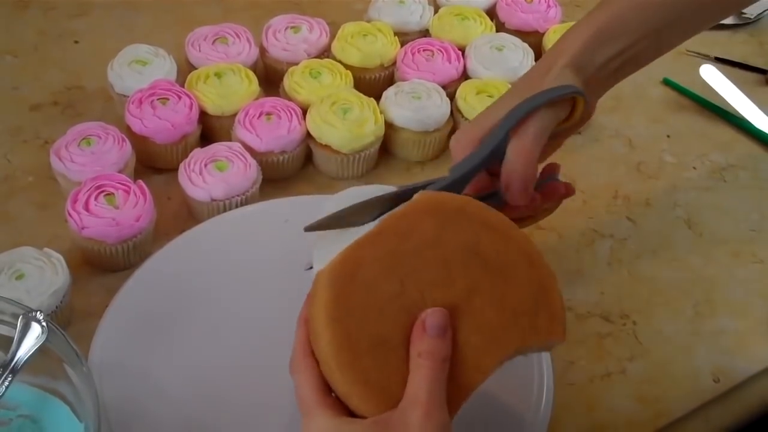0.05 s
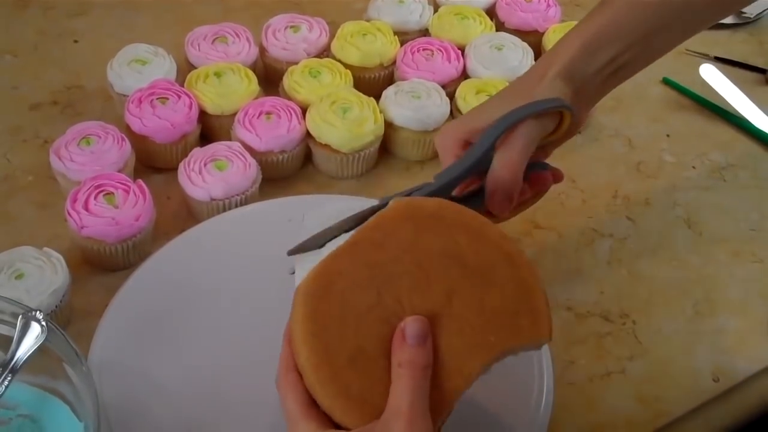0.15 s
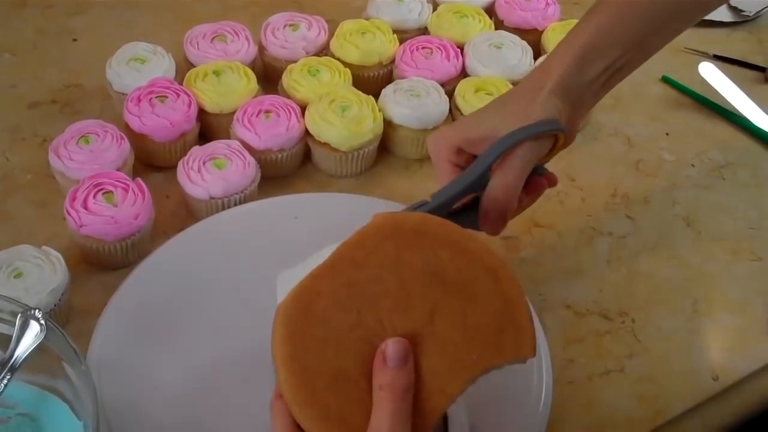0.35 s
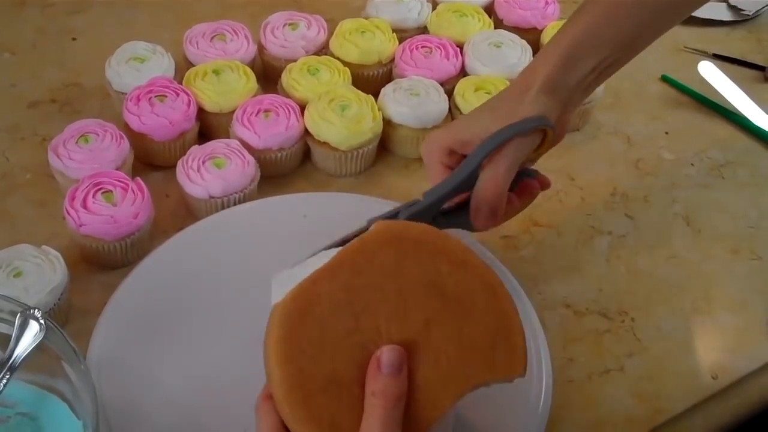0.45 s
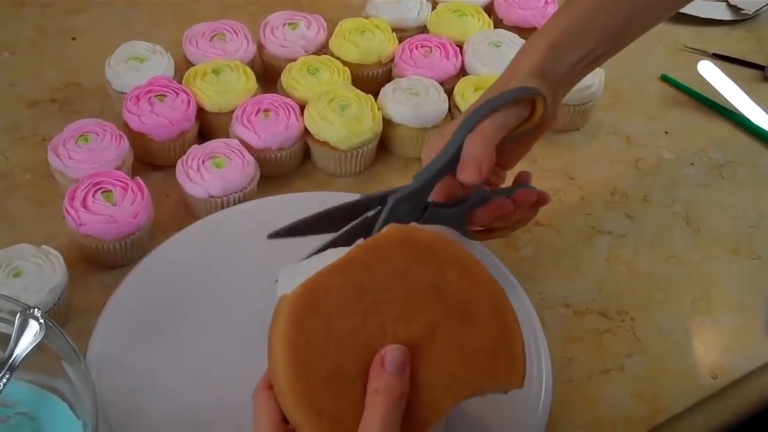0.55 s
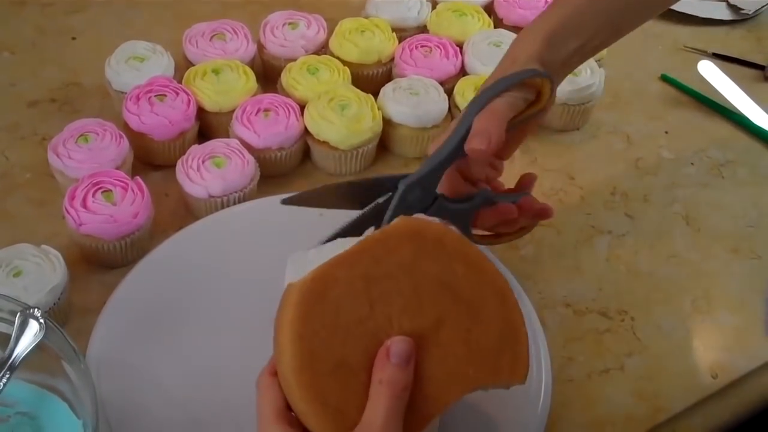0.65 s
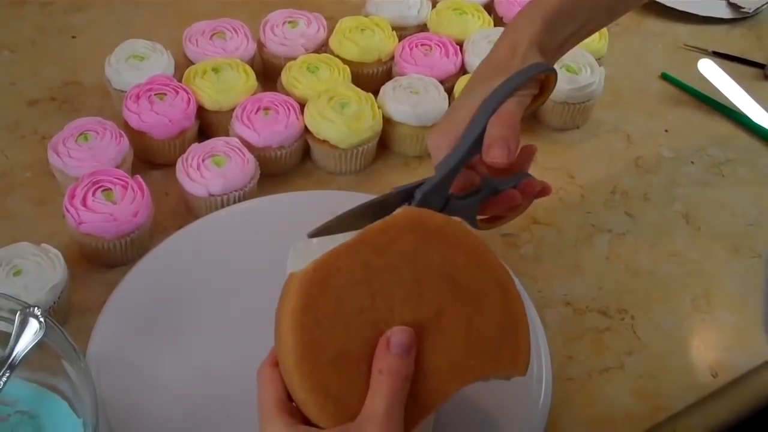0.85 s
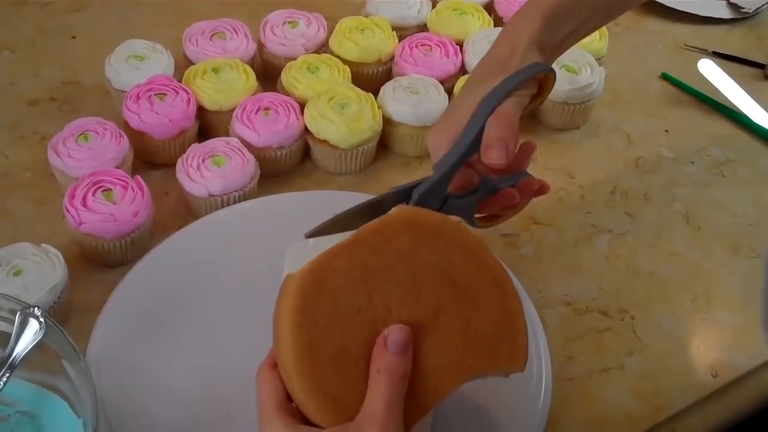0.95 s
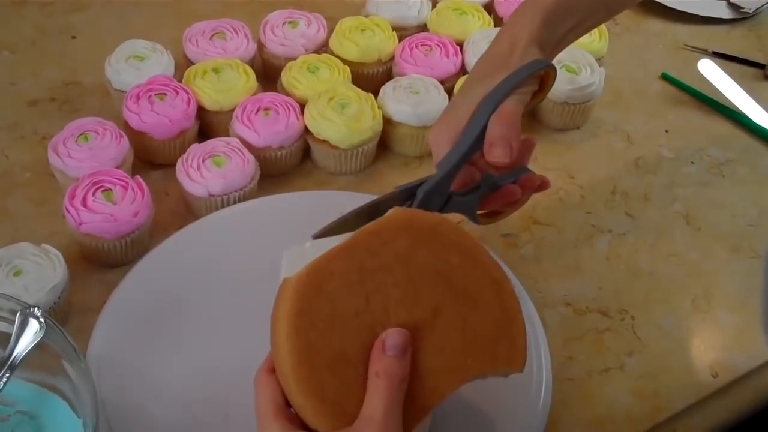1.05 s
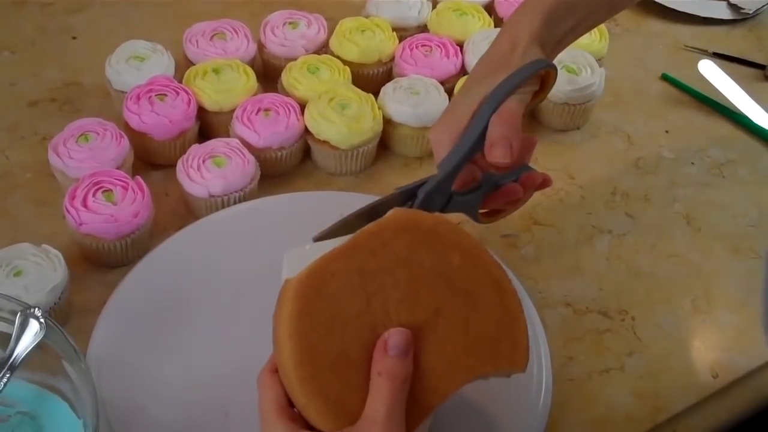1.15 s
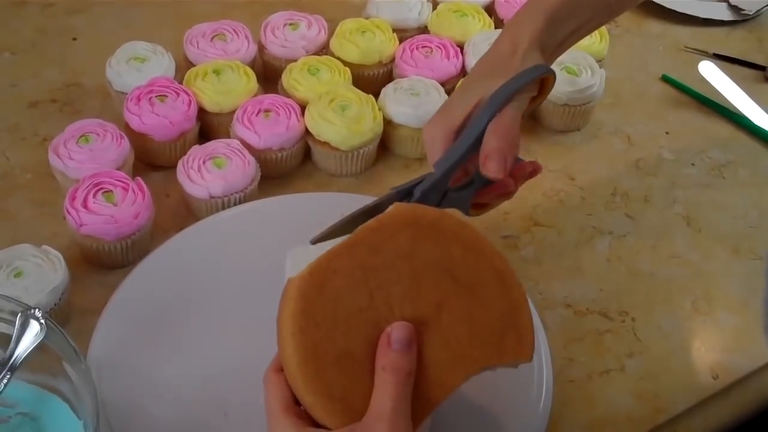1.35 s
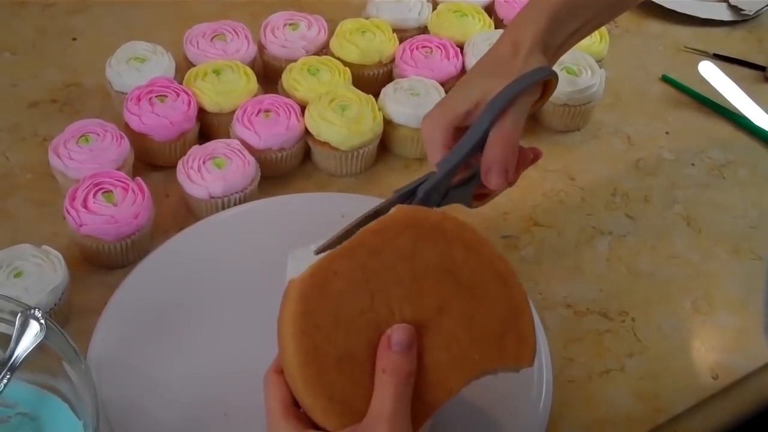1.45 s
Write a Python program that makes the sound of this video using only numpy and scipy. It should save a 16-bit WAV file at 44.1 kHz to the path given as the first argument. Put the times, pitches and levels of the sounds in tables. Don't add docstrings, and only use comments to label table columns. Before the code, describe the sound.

Scissors crunch through thick card with one sharp snap, then rattling and faint ticks in a kitchen.

```python
import sys
import numpy as np
from scipy import signal
from scipy.fft import rfft, irfft
from scipy.io import wavfile
from scipy.ndimage import uniform_filter1d

SR = 44100
rng = np.random.default_rng(int(sys.argv[2]) if len(sys.argv) > 2 else 0)


def master_out(mix):
    frames = np.transpose(np.atleast_2d(mix))
    ceiling = np.clip(frames, -1, 1)
    pcm = np.round(ceiling * 32767).astype(np.int16)
    wavfile.write(sys.argv[1], SR, pcm)


def boost_factor(decibels):
    exponent = np.asarray(decibels, float) / 20
    return 10 ** exponent


N = 66150
CRACK_Q = 3.58


def evened(x):
    return x / np.sqrt(np.mean(x ** 2) + 1e-20)


def peaked(x):
    return x / (abs(x).max() + 1e-20)


def read(points, hz):
    f, value = np.transpose(points)
    return np.interp(np.log(hz + 1), np.log(f + 1), value)


def add(mix, s, sound):
    at = round(s * SR)
    sound = sound[max(-at, 0):]
    part = mix[max(at, 0):][:len(sound)]
    part += sound[:len(part)]


def bell(t, length):
    return np.exp(-(2 * t / length) ** 2)


def dull(x):
    return signal.sosfilt(signal.butter(6, 15000, fs=SR, output="sos"), x)


def resonate(x, hz, width):
    b, a = signal.iirpeak(min(hz, SR / 2.2), max(hz / width, .5), SR)
    return signal.lfilter(b, a, x)


def pair(size, same):
    hz = np.fft.rfftfreq(size, 1 / SR)
    left, other = rfft(rng.standard_normal((2, size)), axis=1)
    likeness = np.clip(read(same, hz), -1, 1)
    right = likeness * left + np.sqrt(1 - likeness ** 2) * other
    return hz, np.array([left, right])


def blades(x):
    # (pitch [Hz], width [Hz], level [dB])
    steel_modes = [(1890, 320, 2.5), (2850, 360, -1), (4000, 440, 5.5), (5670, 550, -2.5),
                   (6660, 530, -0.5), (7880, 890, 3.5), (8420, 800, 3.5), (9830, 1100, -3.5),
                   (12650, 3600, -9)]
    out = 0
    for k, (hz, width, db) in enumerate(steel_modes):
        out = out + (-1) ** k * boost_factor(db) * resonate(x, hz, width)
    return out


def fibres(shape):
    size = boost_factor(2 * np.minimum(rng.exponential(1, shape), 4))
    breaks = rng.random(shape) < 9000 / SR
    return size * rng.standard_normal(shape) * breaks


def crack_clusters(rows, q):
    out, t = np.zeros(N), np.arange(-441, 882) / SR
    strike = 2.18 * (t == 0)
    for (s, db, hz, length, bright), breaks in zip(rows, fibres((len(rows), len(t)))):
        drive = (breaks + strike) * bell(t, length)
        tone = resonate(resonate(drive, hz, hz / q), hz, 2 * hz / q)
        bright = np.clip(bright, 0, 1)
        crack = (1 - bright) * evened(tone) + bright * evened(blades(drive))
        add(out, s + t[0], boost_factor(db) * peaked(crack))
    return out


def board_knocks(rows):
    # (pitch [Hz], level [dB], t60 [s])
    board_modes = [(379.5, -11.5, 0.06), (529, -6.5, 0.035), (565, -11, 0.055), (620, -16.5, 0.1),
                   (780, -5.5, 0.084), (1026, -13, 0.018), (1720, -6, 0.022)]
    reach_db = -27.5
    wobble, wobble_s, wobble_rise_s, onset_s = 0.68, 0.0038, 0.011, 0.00071
    out, t = np.zeros(N), np.arange(0, .2, 1 / SR)
    size = round(wobble_s * SR)
    noise = rng.standard_normal((len(rows), len(t)))
    shakes = evened(uniform_filter1d(uniform_filter1d(noise, size), size))
    spots = rng.choice([-1, 1], (len(rows), len(board_modes)))
    for (s, db, hz, ring_s), spot, shake in zip(rows, spots, shakes):
        ring = boost_factor(-60 * t / ring_s) * np.sin(2 * np.pi * hz * t)
        for (mode_hz, mode_db, t60), sign in zip(board_modes, spot):
            far_db = reach_db * min(abs(np.log2(mode_hz / hz)), .5)
            fade = boost_factor(mode_db + far_db - 60 * t / t60)
            ring = ring + sign * fade * np.sin(2 * np.pi * mode_hz * t)
        broken = 1 + wobble * shake * np.minimum(t / wobble_rise_s, 1)
        add(out, s, boost_factor(db) * peaked(ring * np.minimum(t / onset_s, 1)) * broken)
    return signal.sosfilt(signal.butter(4, 298, "high", fs=SR, output="sos"), out)


def friction(rows):
    out = np.zeros(N)
    for (s, length, db, hz, steel), grit in zip(rows, fibres((len(rows), 22000))):
        u = np.minimum(np.arange(len(grit)) / SR / length, 1)
        stroke = np.sin(np.pi * u ** .7) * (u < 1)
        width = hz * min(hz / 1500, 1.3)
        card = evened(resonate(resonate(grit, hz, width), hz, 2 * width))
        card = card + hz / 12000 * evened(blades(grit))
        scrape = evened(resonate(grit, 8100, 720))
        add(out, s, boost_factor(db) * stroke * ((1 - steel) * evened(card) + steel * scrape))
    return out


def hum():
    # (frequency [Hz], level [dB per Hz])
    spectrum = [(15, -72), (25, -21.5), (237, -20.5), (301, -21), (440, -22), (535, -13), (640, -21.5),
                (2930, -23.5), (15000, -45)]
    # (frequency [Hz], likeness [0-1])
    likeness = [(60, 0.13), (240, 0.53), (930, 0.36), (3690, 0.17), (14600, 0.14)]
    hz, z = pair(N, likeness)
    return boost_factor(-63.5) * evened(irfft(z * boost_factor(read(spectrum, hz)), N, axis=1))


def slides():
    # (start [s], length [s], level [dB], pitch [Hz], steel share [0-1])
    strokes = [(-.05, 0.16, -43.5, 2720, 0.19), (-.1, 0.87, -54, 537, 0.37),
               (0.109, 0.23, -51.5, 2760, 0.23), (.235, 0.07, -39.5, 5150, 0.06), (.33, 0.16, -46, 2360, 0),
               (.545, 0.061, -50.5, 2480, 0), (1.064, 0.19, -66.5, 4900, 0.24),
               (1.132, 0.097, -64, 1950, 0.07), (1.219, 0.1, -60.5, 5960, 0.1),
               (1.289, 0.26, -69.5, 4860, 0), (1.409, 0.23, -62, 5680, 0.07)]
    return dull(friction(strokes))


def scuffs():
    # (start [s], length [s], level [dB], pitch [Hz])
    rubs = [
        (-.03, 0.18, -57, 1100),
        (.14, 0.064, -55, 1050),
        (.325, 0.2, -50.5, 1298),
        (.33, 0.14, -57.5, 358.4),
        (.548, .16, -59, 1350),
        (0.359, 0.079, -48, 640),
        (1.135, .035, -58, 1250),
    ]
    return friction([(*row, 0) for row in rubs])


def further_cracks():
    # (time [s], peak [dB], pitch [Hz], length [s], bright share [0-1])
    breaks = [(.012, -37.5, 2680, .003, 0.2), (.2268, -25.5, 7500, 0.0042, 0),
              (.3244, -13, 10060, 0.0012, 0.17), (.326, -13.5, 7485, 0.0014, 0.23),
              (.3235, -25, 1350, 0.0042, 0), (.3425, -28, 5600, 0.0027, .2), (.343, -33, 1880, 0.0023, 0),
              (.346, -34, 4000, .003, .1), (.353, -33, 3900, 0.0037, .1), (.377, -29.5, 5500, .002, 0.1),
              (.411, -36, 2900, .003, .1), (.4255, -38, 2280, 0.0037, 0.06), (.447, -28.5, 4930, 0.0029, 0),
              (.474, -37, 2625, .004, .1), (.502, -41.5, 2000, 0.0033, 0), (.5165, -41, 2190, .004, 0.23),
              (.545, -40.5, 2310, .006, 0), (.561, -35, 1730, .012, .1), (.579, -43, 2880, .004, .1),
              (.595, -48, 1250, .006, 0), (.610, -48, 2500, 0.0038, 0), (.637, -51.5, 1350, 0.0044, 0.04),
              (.811, -56, 1000, .005, 0), (.879, -59, 950, 0.0039, 0), (1.146, -52.5, 900, .005, 0),
              (1.336, -58, 1400, .008, 0.07)]
    return crack_clusters(breaks, CRACK_Q)


def ticks():
    # (time [s], peak [dB], pitch [Hz], length [s], bright share [0-1])
    taps = [(.122, -35, 6470, 0.0098, 0.8), (.729, -53, 3000, 0.0051, 0.17),
            (.754, -49, 2950, 0.0056, 0.07), (.8065, -49.5, 3000, .004, 0.35),
            (.8275, -46, 2880, 0.0037, 0.01), (.874, -53, 3600, 0.006, 0.05),
            (.880, -56, 5020, 0.0035, 0.7), (.932, -62, 2515, .003, 0.1), (.964, -53.5, 2995, 0.0047, 0),
            (.975, -56.5, 2790, .003, 0.07), (.995, -54, 3040, 0.002, 0.22),
            (1.0785, -52, 2344, 0.0006, 0.43), (1.094, -54, 2950, 0.0027, 0.07),
            (1.140, -53, 1210, 0.0034, 0.3), (1.150, -50.5, 1380, 0.01, 0.47),
            (1.272, -48, 8400, 0.0034, 0.93), (1.338, -55, 800, .012, 0.05),
            (1.391, -51, 5940, 0.0028, 0.43), (1.434, -45, 9550, 0.0016, 0.12),
            (1.466, -44.5, 7000, 0.002, 0.35)]
    return crack_clusters(taps, 2.4)


def cracks():
    # (time [s], peak [dB], pitch [Hz], length [s], bright share [0-1])
    breaks = [(.159, -42, 4570, 0.0053, 0.1), (.1755, -29, 3040, 0.0071, 0.37),
              (.194, -33, 3150, 0.0089, 0.9), (.2045, -18, 5000, 0.0035, 0.64),
              (.2065, -14, 3360, 0.00092, 0.33), (.210, -16.5, 5500, 0.004, 0.42),
              (.2275, -24, 4420, 0.007, 0.46), (.320, -16, 5525, 0.0081, .25),
              (.3250, -4, 3950, 0.0027, 0.84), (.330, -21, 5500, 0.005, 0.05),
              (.386, -27, 3700, .003, 0.85), (.388, -26, 1930, 0.0028, 0.38),
              (.407, -29, 2540, 0.0031, 0.1), (.4465, -26, 2020, 0.0048, 0.16),
              (.451, -25.5, 2800, .002, 0.08), (.454, -30, 3600, 0.0036, 0), (.461, -29, 2443, .004, 0),
              (.516, -45, 5400, 0.003, 0.1), (.5395, -34, 5033, 0.003, 0.36),
              (.557, -34.5, 2150, 0.0059, 0.25), (.562, -35, 2630, 0.0067, 0.08),
              (.575, -40.5, 2150, 0.01, 0.15), (.627, -45.5, 5130, 0.0045, 0.28)]
    return crack_clusters(breaks, CRACK_Q)


def knocks():
    # (time [s], peak [dB], pitch of the struck spot [Hz], t60 [s])
    hits = [(.2055, -28, 976, .025), (.3225, -25, 1182, 0.007), (.324, -32, 777, 0.087),
            (.3675, -29.5, 512, 0.032), (.376, -42.5, 618, 0.037), (.408, -35.5, 1262, 0.042),
            (.409, -40.5, 590, 0.031), (.449, -35.5, 990, 0.024), (.474, -43.5, 485, 0.047),
            (.518, -53.5, 490, 0.031), (.539, -32.5, 582, 0.021), (.556, -43, 780, 0.027),
            (.560, -40.5, 1230, 0.045), (.576, -48, 620, 0.03), (.605, -43.5, 558, 0.032),
            (.627, -48.5, 597, 0.1), (.675, -51, 502, 0.065), (.731, -63, 592, 0.093),
            (.805, -55.5, 606, .04), (.830, -54, 563, 0.056), (1.144, -56, 780, .025),
            (1.313, -54, 556, 0.04)]
    return board_knocks(hits)


def snap():
    snap_s, snap_db, length_s, from_hz, to_hz = .3233, -12, 0.002, 3100, 1635
    out, t = np.zeros(N), np.arange(-220, 220) / SR
    hz = to_hz + (from_hz - to_hz) * np.clip(.5 - t / length_s, 0, 1)
    whip = bell(t, length_s) * np.sin(2 * np.pi * np.cumsum(hz) / SR)
    add(out, snap_s + t[0], boost_factor(snap_db) * whip)
    return out


def thump():
    t = np.arange(N) / SR - .3245
    left_right_db = np.array([[-12.5], [0]])
    return boost_factor(-35 + left_right_db) * bell(t, 0.0017)


def rattle(count=70):
    start_s, length_s, low_hz, high_hz = 0.4, .3, 1500, 5500
    when, size, pitch = rng.random((count, 3)).T
    hz = low_hz * (high_hz / low_hz) ** pitch
    db = -38 - 13 * when - 19.0 * size
    rows = [(start_s + length_s * u, d, f, .0025, .15) for u, d, f in zip(when, db, hz)]
    return crack_clusters(rows, 5.6)


def bends():
    # (centre [s], peak [dB], pitch [Hz], length [s])
    swells = [
        (.422, -36, 565, 0.019),
        (.454, -37.5, 560, 0.013),
        (.482, -49.5, 498, 0.042),
        (.565, -36, 565, .026),
        (0.584, -43, 545, .018),
    ]
    t = np.arange(N) / SR
    out = np.zeros(N)
    for s, db, hz, length in swells:
        out += boost_factor(db) * bell(t - s, length) * np.sin(2 * np.pi * hz * (t - s))
    return out


def flutters():
    # (time [s], peak [dB], pitch [Hz], t60 [s])
    taps = [(.655, -50.5, 474, 0.033), (.783, -59.5, 505, 0.033), (.863, -58.5, 503, 0.052),
            (.923, -62.5, 546, .05), (.964, -58.5, 537, .05), (.998, -61.5, 549, 0.057),
            (1.053, -65.5, 552, .04), (1.075, -64, 550, 0.038), (1.096, -65, 538, 0.053),
            (1.189, -62.5, 500, .04), (1.212, -64, 517, 0.035), (1.247, -59, 506, .04),
            (1.271, -59, 503, 0.043), (1.435, -64.5, 522, 0.034)]
    return board_knocks(taps)


def ports(near):
    # (frequency [Hz], side under mid [dB])
    side_level = [(300, -19.5), (1200, -22), (4300, -10.5), (8000, -4), (14000, -3)]
    hz, t = np.fft.rfftfreq(N, 1 / SR), np.arange(512) / SR
    scatter = rng.standard_normal(len(t)) * np.exp(-t / .005)
    side = rfft(scatter / np.linalg.norm(scatter), N) * boost_factor(read(side_level, hz))
    return irfft(rfft(near) * (1 + np.array([side, -side])), N, axis=1)


def room(x):
    # (frequency [Hz], t60 [s])
    decay = [(200, 0.98), (500, 0.7), (1500, 0.67), (4000, 0.49), (8000, 0.36), (13000, 0.23)]
    # (frequency [Hz], likeness [0-1])
    likeness = [(300, 0.42), (1500, 0.94), (4000, 0.13), (9000, 0.1035)]
    # (frequency [Hz], level [dB])
    colour = [(600, -5.5), (1500, -7), (9000, 0), (12000, 1), (15000, -17.5)]
    late_db, start_s, early_db, early_t60_s = -7, .004, -12.5, 0.054
    noise = irfft(pair(SR, likeness)[1], axis=1)
    hz, t, z = signal.stft(noise, SR, nperseg=256)
    late = boost_factor(late_db - 60 * t / read(decay, hz)[:, None]) / np.sqrt(read(decay, 2010))
    early = boost_factor(early_db - 60 * t / early_t60_s) / np.sqrt(early_t60_s)
    shaped = z * (late + early) * boost_factor(read(colour, hz))[:, None]
    tail = signal.istft(shaped, SR, nperseg=256)[1]
    tail = tail * np.sqrt(6 * np.log(10) / SR)
    tail = np.pad(tail, ((0, 0), (round(start_s * SR), 0)))
    return signal.fftconvolve(x[None], tail, axes=1)[:, :N]


def scene():
    cutting = cracks() + further_cracks() + snap() + rattle()
    handling = ticks() + slides() + scuffs()
    board = knocks() + flutters() + bends()
    near = cutting + handling + board
    return ports(near) + thump() + room(near) + dull(hum())


def roll_off(x):
    return signal.sosfilt(signal.butter(12, 15150, fs=SR, output="sos"), x)


def record(dry):
    cut = signal.sosfilt(signal.butter(8, 12460, fs=SR, output="sos"), dry)
    return roll_off(cut - 0.00042)


dry = scene()
out = record(dry)
master_out(out)
```